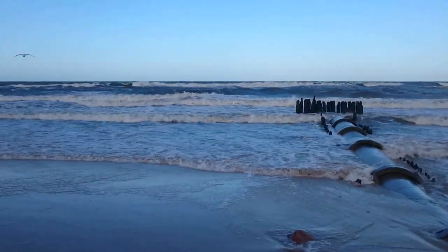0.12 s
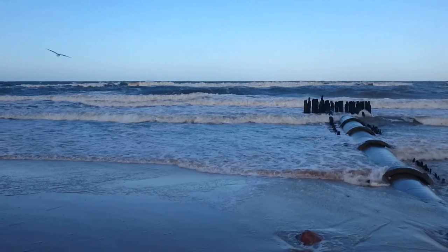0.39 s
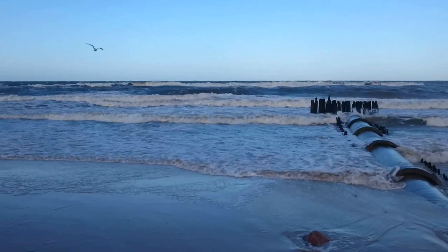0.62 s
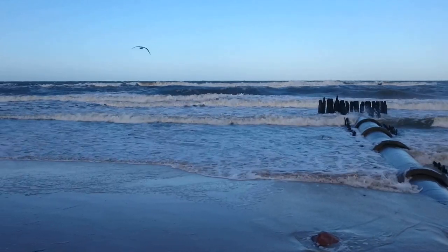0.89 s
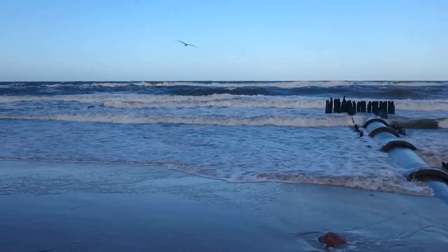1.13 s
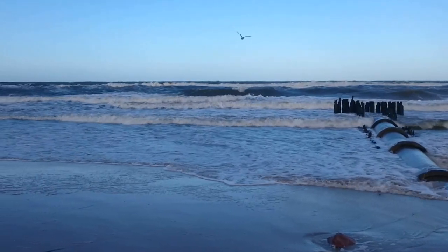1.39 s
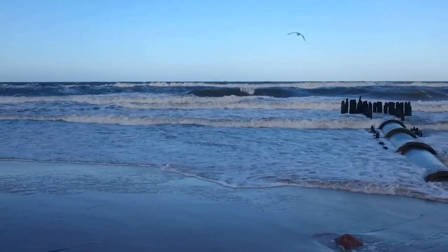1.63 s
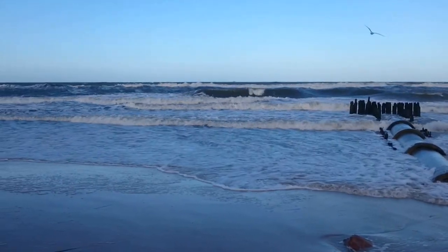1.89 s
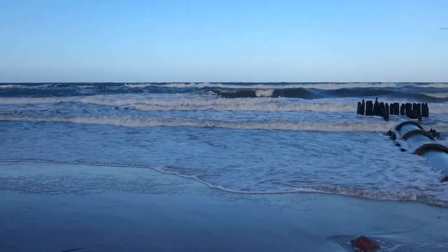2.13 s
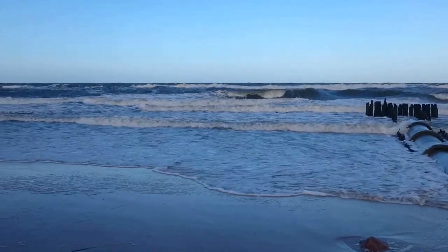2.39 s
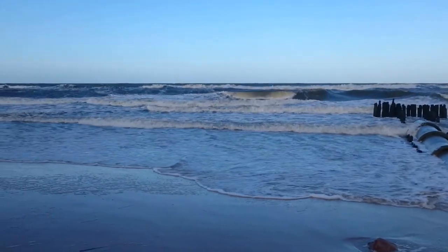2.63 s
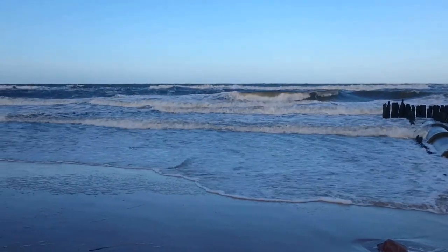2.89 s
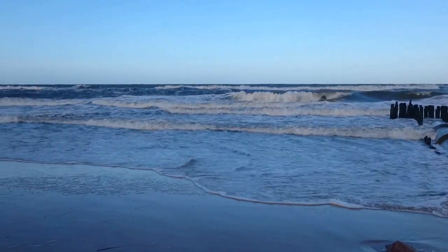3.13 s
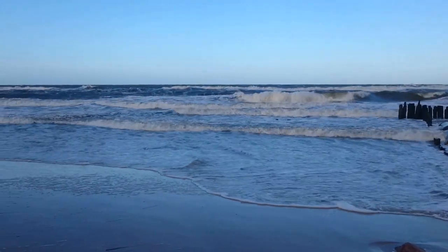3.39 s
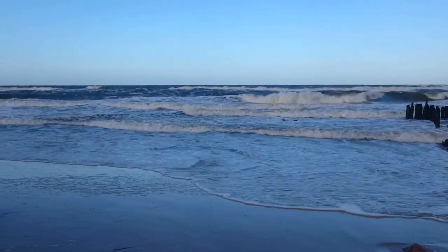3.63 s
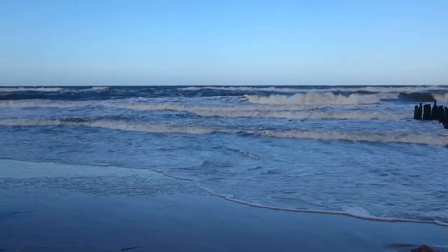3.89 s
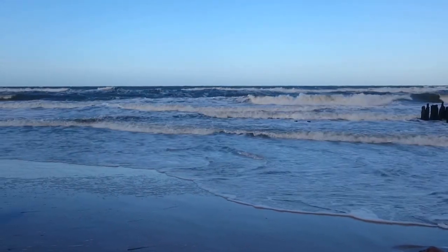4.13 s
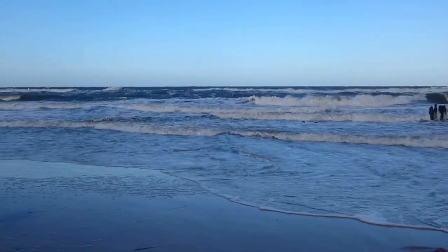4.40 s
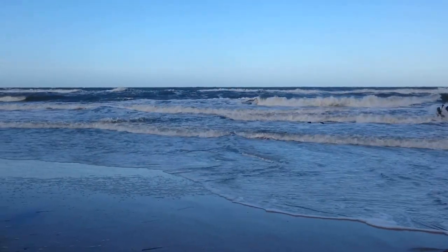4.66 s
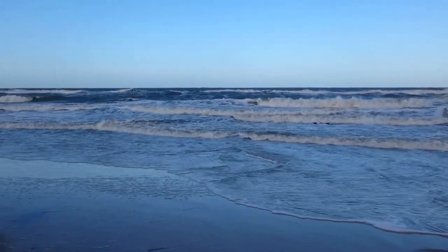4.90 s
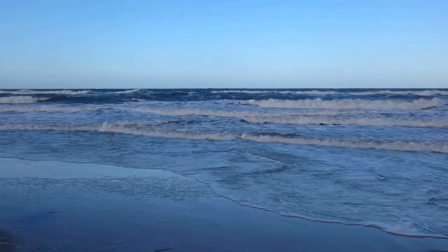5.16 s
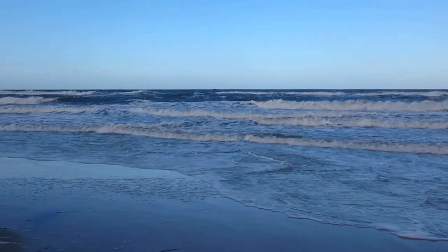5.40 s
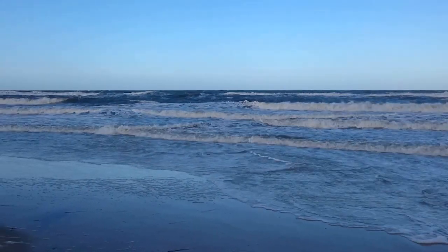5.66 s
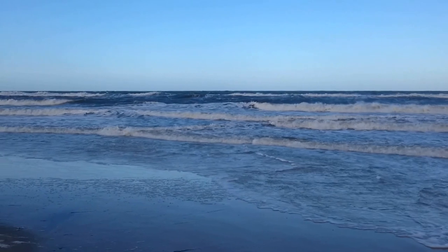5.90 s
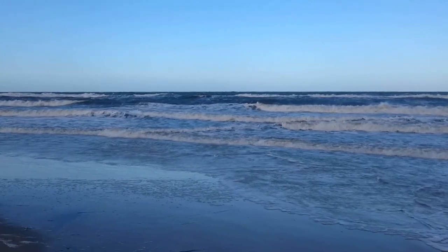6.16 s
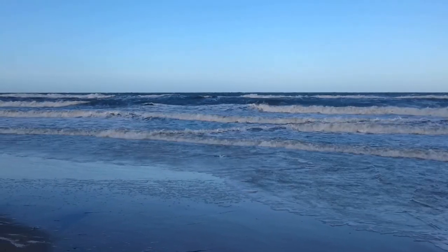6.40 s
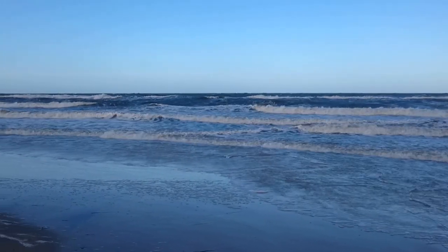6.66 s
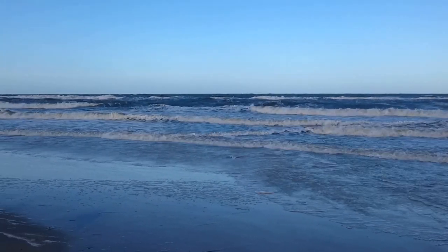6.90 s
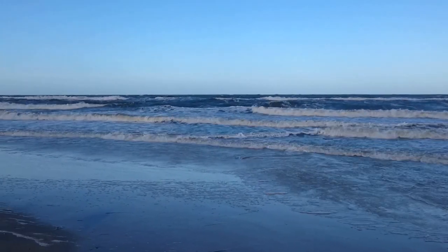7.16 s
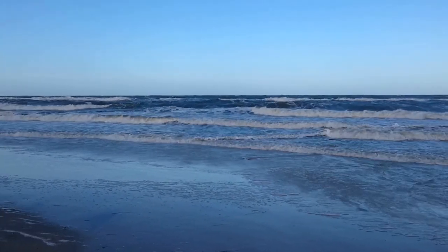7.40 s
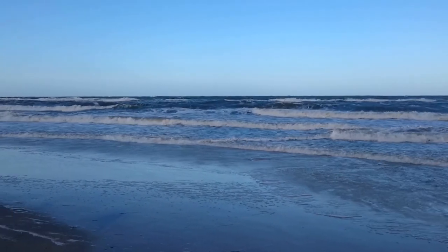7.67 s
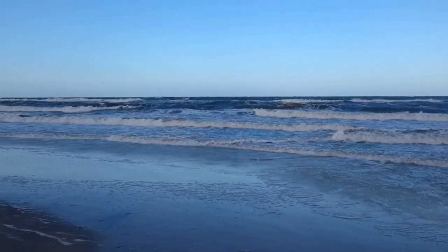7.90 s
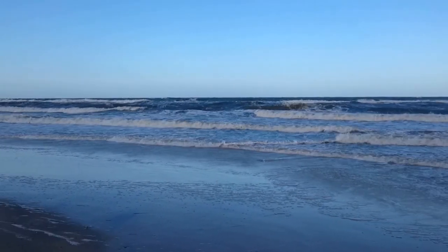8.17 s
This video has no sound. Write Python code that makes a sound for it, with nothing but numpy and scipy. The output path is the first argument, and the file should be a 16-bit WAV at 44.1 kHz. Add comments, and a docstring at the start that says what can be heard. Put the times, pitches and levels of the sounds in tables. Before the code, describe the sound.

Outdoors on an open beach, gusty wind hits the stereo microphone directly. The right side rumbles, roars and crackles from the start, while the left is calmer at first, then fills with deep buffeting. Behind it, surf is a continuous wide foamy hiss, fairly faint early and fuller later. One hard wind thump bursts on the right just after four seconds; afterwards the snaps become sparse and the rumble smoother.

```python
"""A gale rumbles, roars and snaps at the right microphone port at once, over the hiss of surf on a beach.
The left port is sheltered at first; the two ports colour the surf unlike each other.
Surf is filtered noise, partly shared by the ports. Eddies are noise patterns swept past each port, giving
a lumpy rumble and a roar that brightens with wind speed. Fast whirls are short ragged bursts with wakes.
A quick limiter holds the peaks down."""
import sys
import numpy as np
from scipy import signal
from scipy.fft import rfft, irfft, next_fast_len
from scipy.io import wavfile
from scipy.ndimage import uniform_filter1d, minimum_filter1d, map_coordinates

SR = 44100
rng = np.random.default_rng(int(sys.argv[2]) if len(sys.argv) > 2 else 0)


def amplitude_ratio(level_db):
    """Convert a level in decibels to the matching linear amplitude (field) ratio."""
    exponent = np.asarray(level_db, float) / 20
    return 10 ** exponent


def master_out(mix):
    """Clip the mix to full scale and print it as 16-bit PCM to the path in sys.argv[1]."""
    frames = np.transpose(np.atleast_2d(mix))
    ceiling = np.clip(frames, -1, 1)
    pcm = np.round(ceiling * 32767).astype(np.int16)
    wavfile.write(sys.argv[1], SR, pcm)


N = 365588


def evened(x):
    """Normalisation: scales a signal to rms 1."""
    return x / np.sqrt(np.mean(x ** 2) + 1e-20)


def curve(points):
    """Linear interpolation: a control curve at every sample."""
    return np.interp(np.arange(N) / SR, *np.transpose(points))


def read(points, hz):
    """Spectral interpolation: reads a table along a log-frequency axis."""
    table_hz, value = np.transpose(points)
    return np.interp(np.log(hz + 1), np.log(table_hz + 1), value)


def coloured(points, size):
    """Spectral shaping: steady random noise weighted by a given spectrum, rms 1."""
    hz = np.fft.rfftfreq(size, 1 / SR)
    spectrum = rfft(rng.standard_normal(size)) * amplitude_ratio(read(points, hz))
    return evened(irfft(spectrum, size))


def wander(hz):
    """Low-pass random modulation: slow chance up to about hz, near rms 1."""
    points = [(hz / 8, -6), (hz / 2, 0), (hz, -3), (hz * 3, -30), (hz * 9, -70)]
    return coloured(points, size=next_fast_len(N))[:N]


# changing level of the surf: (time [s], level [dB])
SURF_LEVEL = [(0, -49.5), (.28, -45), (.42, -48), (.58, -41), (1.12, -42), (1.24, -46.5), (1.68, -44.5),
              (1.82, -48.5), (1.9, -43.5), (2.1, -50), (2.46, -50.5), (2.56, -53), (2.7, -49.5), (3.1, -47),
              (3.38, -47), (3.48, -40.5), (3.8, -36.3), (4.36, -44.5), (4.66, -39.5), (4.95, -41.5),
              (5.46, -38), (5.64, -44), (6.0, -36), (6.16, -41), (6.34, -37.5), (6.48, -42), (6.68, -36.5),
              (6.96, -40.5), (7.64, -36), (7.76, -40), (8.0, -36), (8.29, -41.5)]
# colour of the surf through each port: (frequency [Hz], level [dB])
SURF_COLOUR_LEFT = [(150, -10), (1000, -20), (1800, -14), (3000, -26), (3600, -21), (4500, -17.5),
                    (5500, -22), (7000, -14), (9100, -15), (10000, -24), (11500, -32), (12100, -45),
                    (12500, -95)]
SURF_COLOUR_RIGHT = [(150, -15), (1000, -3), (1800, -5.5), (3000, -9.5), (3600, -7), (4300, -9),
                     (5000, -14.5), (7000, -23.5), (9200, -27), (10500, -22.5), (12000, -28), (13300, -27),
                     (14000, -40), (14600, -75)]
# likeness of the surf at the two ports: (frequency [Hz], left-right correlation [-1 to 1])
SURF_LIKENESS = [(800, .02), (2500, 0.25), (3500, 0.062), (5100, 0.12), (8000, 0.041)]


def surf(flicker_db=0.4, slosh_db=0.6, bright=0.12, fizz=0.3):
    """Partial coherence: wide foam hiss, part shared by both ports, that brightens as it grows louder."""
    frames, hop = N // 128 + 5, 128
    hz = np.fft.rfftfreq(512, 1 / SR)
    at = np.minimum(np.arange(frames) * hop, N - 1)
    level_db = curve(SURF_LEVEL)[at]
    flicker = evened(uniform_filter1d(rng.standard_normal(frames), size=6))
    # dB of brightening per dB of surf level, with extra fizz above 9.3 kHz
    tilt = bright * np.log2(hz / 8000 + 0.15) + fizz * np.clip(hz / 3000 - 3.1, 0, 1)
    tilt_db = np.outer(tilt, level_db - level_db.mean())

    a, b, c, d = rng.standard_normal((4, len(hz), frames))
    left, unshared = a + 1j * b, c + 1j * d
    likeness = np.clip(read(SURF_LIKENESS, hz), -1, 1)[:, None]
    right = likeness * left + np.sqrt(1 - likeness ** 2) * unshared
    colour_db = np.array([read(SURF_COLOUR_LEFT, hz), read(SURF_COLOUR_RIGHT, hz)])
    spectra = np.array([left, right]) * amplitude_ratio(colour_db)[:, :, None]
    spectra *= amplitude_ratio(level_db + tilt_db + flicker_db * flicker + slosh_db * wander(5.)[at])
    return signal.istft(spectra, nperseg=512, noverlap=384)[1][:, :N]


def eddies(points, gust, gusty):
    """Frozen turbulence: a fixed pattern of pressure swept past the port; faster air plays it higher."""
    speed = np.exp(gusty * np.clip(gust, -3, 3))
    place = np.cumsum(speed / uniform_filter1d(speed, size=SR))
    pattern = coloured(points, size=next_fast_len(N + 9))
    return map_coordinates(pattern, [place], order=3, mode="wrap")


# the strongest whirls: (time [s], port [0 left, 1 right], level near 800 Hz [dB],
#                        slope above 800 Hz [dB per octave], half-height length near 800 Hz [ms])
STRONG_WHIRLS = [(0.014, 1, -19, -4.5, 6), (0.046, 1, -19, -6, 3.6), (0.107, 1, -14, -1.2, 6.3),
                 (0.133, 1, -15, -6.5, 3.7), (0.254, 1, -15.5, -7.6, 2), (0.361, 1, -14.5, -4, 3),
                 (0.397, 1, -19, -9, 3.5), (0.427, 1, -5, -3.5, 2.1), (0.511, 1, -14.5, -13, 2.3),
                 (0.59, 1, -14, -6, 5.4), (0.691, 1, -11.5, -4, 4), (0.772, 1, -13, -7.5, 4.8),
                 (1.005, 1, -15, -9, 4.5), (1.066, 1, -15, -21, 4.3), (1.144, 1, -21, -5, 3.3),
                 (1.214, 1, -15.7, -3, 2.5), (1.242, 1, -14, -15, 2.6), (1.316, 1, -9.5, -2.5, 8.3),
                 (1.345, 1, -16, -7, 3), (1.427, 1, -12, -4, 4), (1.439, 1, -17, 0, 5),
                 (1.647, 1, -14, -15, 4.8), (1.662, 1, -19, -4, 6.5), (1.682, 1, -13, -3, 2.4),
                 (1.706, 1, -16, -3, 2.7), (1.722, 1, -14, -4, 5.7), (1.736, 1, -16, -3, 6.5),
                 (1.782, 1, -14, -4, 2.7), (1.812, 1, -16, -7.5, 3.7), (1.892, 1, -17, -2.5, 2.9),
                 (1.938, 1, -13, -5, 6), (1.995, 1, -9, -4, 5.3), (2.049, 1, -21, -2.5, 2.5),
                 (2.059, 1, -19, -2.3, 2.7), (2.219, 1, -14, -7.5, 1.7), (2.279, 1, -20, -4, 2),
                 (2.27, 1, -23, -4, 3), (2.323, 1, -21, -5.6, 3.2), (2.35, 1, -23, -4.5, 4),
                 (2.39, 1, -22, -3.5, 8), (2.52, 1, -17, -2.5, 3.2), (2.547, 1, -16, -6.5, 3.3),
                 (2.674, 1, -18.5, -8, 4.4), (2.819, 1, -18, -8.5, 3.3), (2.923, 1, -14, -9.5, 3.7),
                 (3.007, 1, -12, -5, 5.6), (3.221, 1, -10.5, -3, 2.9), (3.245, 1, -18, -6, 4.4),
                 (3.311, 1, -19, -10.5, 2.9), (3.387, 1, -18, -11.5, 3.2), (4.222, 1, -13, -13, 7.7),
                 (4.25, 1, -2, -3, 6.6), (4.26, 1, 3, -6, 2.7), (4.366, 1, -19, -8, 2.6),
                 (4.709, 1, -13, -19, 3.7), (4.935, 0, -28, -10, 5), (5.099, 1, -17, -10, 1.7),
                 (5.616, 0, -27, -12, 8.1), (6.249, 0, -26, -14, 8.2), (6.771, 0, -22, -11.6, 4.5),
                 (6.837, 1, -11, -16, 2.2), (7.69, 0, -28, -14, 7.4), (8.157, 0, -25, -8, 6.0)]
# typical small whirl, a row for each port: (level near 800 Hz [dB], slope above 800 Hz [dB per octave],
#                                            half-height length near 800 Hz [ms], scatter in time [s])
TYPICAL_SMALL_WHIRL = [(-35, -14, 6, .15), (-27, -7.5, 2.3, .035)]


def small_whirls(port, count):
    """Clustered point process: small whirls scattered at random near the strong ones."""
    level_spread_db, slope_spread_db, log_length_spread = 3.5, 2.5, .35
    db, slope_db, ms, scatter = TYPICAL_SMALL_WHIRL[port]
    strong = np.array([row[0] for row in STRONG_WHIRLS if round(row[1]) == port])
    a, b, c, d = rng.standard_normal((count, 4)).T
    times = np.clip(strong[np.arange(count) % len(strong)] + scatter * d, 0, N / SR)
    levels_db = db + level_spread_db * a
    slopes_db = slope_db + slope_spread_db * b
    lengths_ms = ms * np.exp(log_length_spread * c)
    return list(zip(times, np.full(count, port), levels_db, slopes_db, lengths_ms))


def add_burst(envelope, s, size, level_db):
    """Superposition: adds one Hann-shaped swell of size samples centred near time s."""
    start = max(round(s * SR) - size // 2, 0)
    envelope[start:start + size] += amplitude_ratio(level_db) * np.hanning(size)


def whirls(port, small, bass_slope_db=1.5, shrink=0.18, top_loss_db=19.0, wake_db=-10.5, wake_length=4.6):
    """Octave-band burst synthesis: ragged snaps, shorter in the treble, amid weaker, duller popping wakes."""
    out = np.zeros(N)
    ragged = evened(rng.standard_normal(N) ** 3)  # cubing makes the noise spiky
    pops = evened(amplitude_ratio(8.9 * wander(213)))
    for hz in 200 * 2 ** np.arange(6):
        octaves = np.log2(hz / 800)
        shape, wake = np.zeros(N + SR), np.zeros(N + SR)
        for s, at, db, slope_db, ms in STRONG_WHIRLS + small:
            if round(at) != port:
                continue
            size = max(round(2 * ms * SR / 1000 * np.exp(-shrink * octaves)), 8)
            level_db = db + (slope_db * octaves if octaves > 0 else -bass_slope_db * octaves)
            level_db -= top_loss_db * max(octaves - 2, 0)  # the port dulls the top octave
            add_burst(shape, s, size, level_db)
            add_burst(wake, s, round(size * wake_length), level_db + wake_db - 2 * octaves)
        band = signal.butter(3, [hz / np.sqrt(2), hz * np.sqrt(2)], "bandpass", fs=SR, output="sos")
        out += (shape[:N] + pops * wake[:N]) * evened(signal.sosfiltfilt(band, ragged))
    return out


# relative spectrum of the rumble: (frequency [Hz], level [dB])
RUMBLE_COLOUR = [(15, -50), (30, -26), (48, -3.5), (62, 2), (90, -2.5), (160, -9), (260, -18), (500, -29.5),
                 (2000, -120)]
# relative spectrum of the roar at mean wind speed: (frequency [Hz], level [dB])
ROAR_COLOUR = [(60, -25), (150, -6.5), (230, -1.35), (400, -7), (700, -19), (1200, -30), (2500, -62),
               (8000, -125)]


def wind(port, rumble_db, roar_db, gusty, lumpy_db, small):
    """Common modulation: the same gusts and lumps shake rumble and roar; each port's wind is independent."""
    gust, lumps = wander(60.4), wander(15.)
    rumble = eddies(RUMBLE_COLOUR, gust, gusty=.12)
    rumble = evened(rumble * amplitude_ratio(0.8 * gust + lumpy_db * lumps))
    roar = eddies(ROAR_COLOUR, gust, gusty)
    roar_swing_db = 1.72 * gust + 1.34 * lumpy_db * lumps + 0.71 * wander(29) + 1.9 * wander(16.)
    roar = evened(roar * amplitude_ratio(roar_swing_db))
    return amplitude_ratio(rumble_db) * rumble + amplitude_ratio(roar_db) * roar + whirls(port, small)


# rumble at the left port, sheltered at first: (time [s], level [dB])
RUMBLE_LEVEL_LEFT = [(0.0, -26.0), (0.2, -20.9), (0.44, -23.6), (0.56, -17.0), (0.7, -24.3), (1.26, -13.6),
                     (2.04, -28.1), (2.58, -24.3), (2.64, -20.7), (3.3, -25.6), (3.5, -16.9), (4.06, -10.6),
                     (4.16, -16.5), (4.86, -12.1), (5.22, -14.5), (5.66, -10.9), (5.74, -18.7),
                     (6.04, -11.3), (7.76, -12.2), (7.82, -16.4), (8.08, -9.1), (8.28, -14.5)]


def left_wind():
    """Level coupling: at the left port the roar follows the rumble, swinging slightly wider in dB."""
    rumble_db = curve(RUMBLE_LEVEL_LEFT)
    return wind(port=0, rumble_db=rumble_db, roar_db=1.13 * rumble_db - 9.8, gusty=0.1316, lumpy_db=3.,
                small=small_whirls(port=0, count=18))


# rumble at the right port: (time [s], level [dB])
RUMBLE_LEVEL_RIGHT = [(0, -12.5), (.36, -8.5), (.5, -16), (.6, -10), (1.2, -8), (1.35, -16), (1.45, -9.5),
                      (1.58, -13), (2.05, -7.5), (2.5, -8.5), (2.62, -14), (2.8, -8.5), (3.42, -13.5),
                      (3.6, -11), (4.05, -9.5), (4.42, -13), (4.82, -10), (5.1, -13), (5.52, -9),
                      (5.7, -13.5), (6.05, -9.5), (6.5, -14), (6.94, -10.5), (7.16, -14), (7.7, -10.5),
                      (7.86, -14), (8.12, -8), (8.29, -16)]
# roar at the right port: (time [s], level [dB])
ROAR_LEVEL_RIGHT = [(0, -22), (.4, -22), (.47, -30), (.56, -22), (.95, -25), (1.25, -22), (1.38, -33),
                    (1.5, -21), (1.95, -21), (2.13, -28), (2.25, -22), (2.5, -26), (2.6, -30), (3.04, -20),
                    (3.36, -26), (3.6, -20), (4.1, -22.5), (4.25, -18), (4.4, -23), (5.42, -20),
                    (5.86, -24), (6.0, -18), (6.12, -23), (7.3, -21), (7.5, -24), (8.2, -22)]
# roughness as the right port turns out of the wind: (time [s], spread of log wind speed [no unit])
ROUGHNESS_RIGHT = [(0, .5), (3.3, 0.49), (3.6, .35), (5.2, 0.304), (8.29, .25)]


def right_wind():
    """Turbulence intensity: rougher air at the right port spreads the speeds that sweep the roar past."""
    return wind(port=1, rumble_db=curve(RUMBLE_LEVEL_RIGHT), roar_db=curve(ROAR_LEVEL_RIGHT),
                gusty=curve(ROUGHNESS_RIGHT), lumpy_db=2.1, small=small_whirls(port=1, count=140))


def scene():
    """Linear superposition: the surf plus separate wind at each port."""
    return surf() + np.array([left_wind(), right_wind()])


def limiter(x, ceiling_db=-1.5, recover_db=1800.):
    """Look-ahead peak limiting: each channel's gain dips just before a peak and recovers in dB a second."""
    over_db = np.maximum(20 * np.log10(abs(x) + 1e-9) - ceiling_db, 0)
    rise = np.arange(N) * recover_db / SR
    held_db = np.maximum.accumulate(over_db + rise, axis=1) - rise
    ahead_db = -minimum_filter1d(-held_db, size=65, axis=1)  # a running maximum
    return x / amplitude_ratio(uniform_filter1d(ahead_db, size=64, axis=1))


def low_pass(x):
    """Removes everything above the highest recorded frequency."""
    return signal.sosfilt(signal.butter(12, 14910, fs=SR, output="sos"), x)


def record(dry):
    """Signal chain: the limiter tames the peaks of the mix before it is stored."""
    mix = limiter(dry)
    return low_pass(mix)


dry = scene()
out = record(dry)
master_out(out)
```